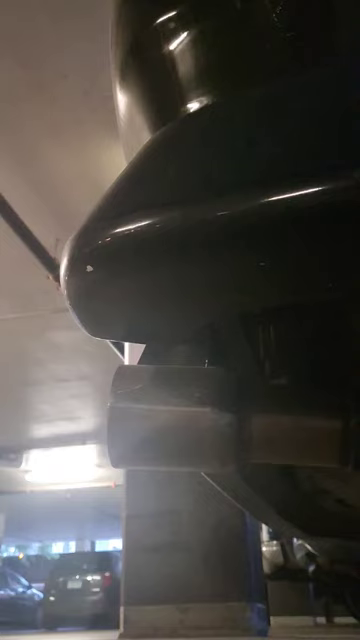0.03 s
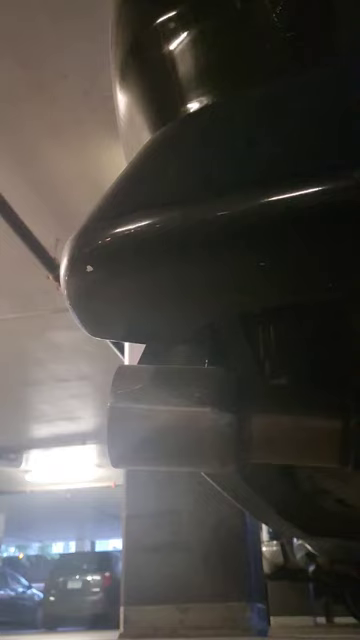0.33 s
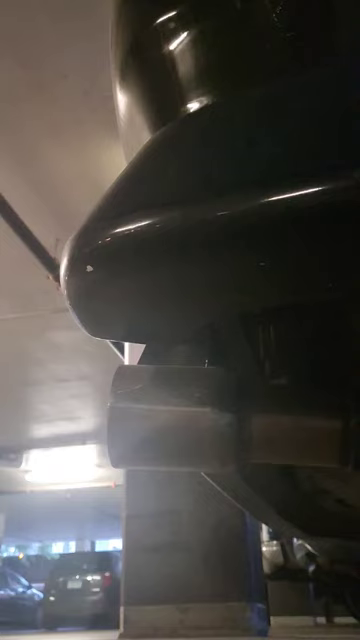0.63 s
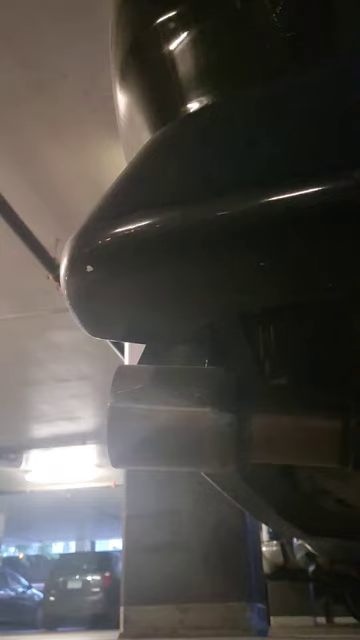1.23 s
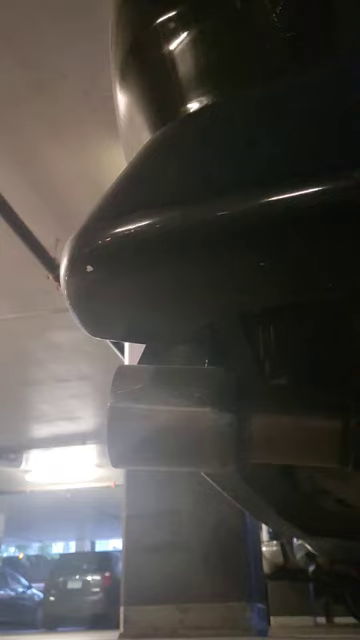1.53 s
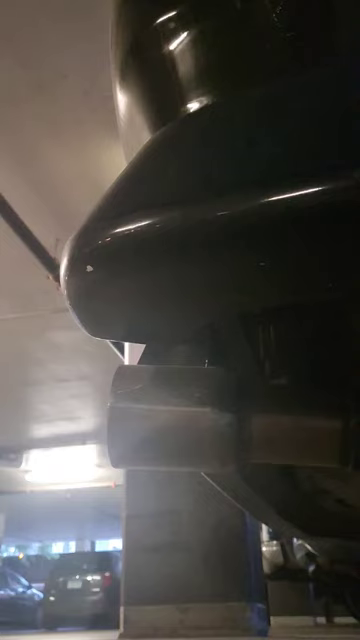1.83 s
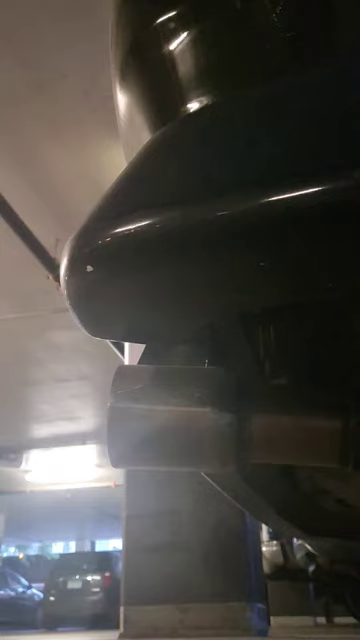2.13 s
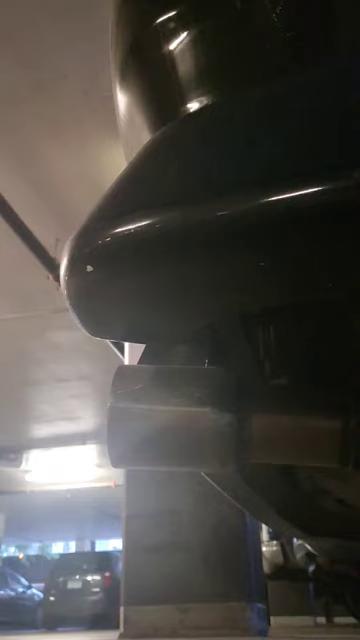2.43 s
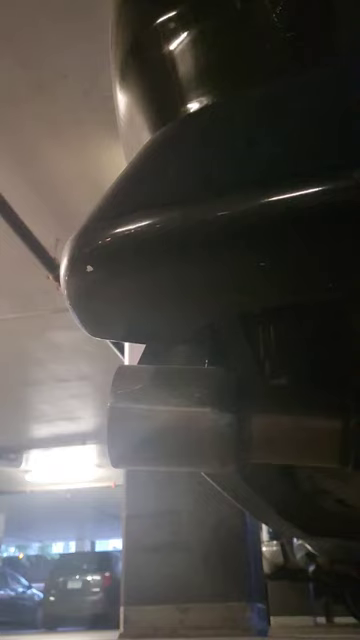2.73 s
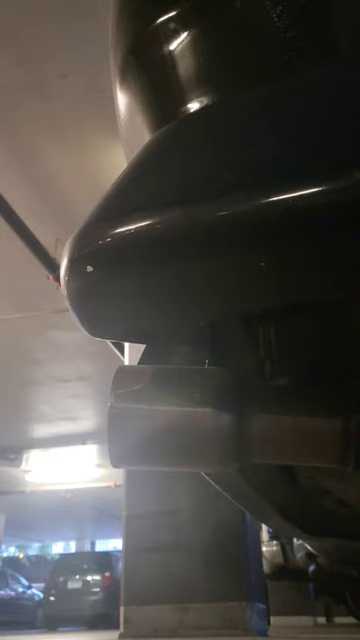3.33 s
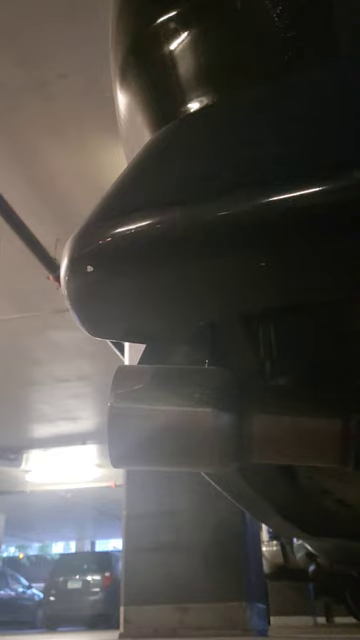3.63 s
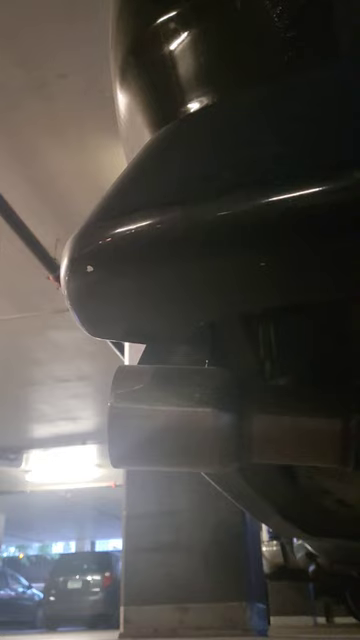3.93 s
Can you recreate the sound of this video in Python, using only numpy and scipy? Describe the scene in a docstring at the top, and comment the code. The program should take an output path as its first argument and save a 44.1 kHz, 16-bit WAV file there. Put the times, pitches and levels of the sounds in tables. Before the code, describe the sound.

A car starts in a concrete parking garage. Ventilation hums first, then the starter clacks and grinds, and the engine catches, sputters and settles into a fast idle, heard from the floor near the tailpipe.

```python
"""Ventilation hums in a concrete parking garage, with a few faint ticks. Then a four-cylinder car starts
from cold, heard from the floor near its tailpipe. The pinion's impact rings the ring gear, and the starter
grinds through eight compressions. The engine catches, flares, stumbles on a few misfires and settles into
a fast idle: a train of gas pulses that excites the resonances of silencer and pipe, reflected by the room."""
import sys
import numpy as np
from scipy import signal
from scipy.fft import rfft, irfft
from scipy.io import wavfile
from scipy.ndimage import uniform_filter1d, minimum_filter1d

SR = 44100
rng = np.random.default_rng(int(sys.argv[2]) if len(sys.argv) > 2 else 0)


def digitize_waveform(pressure):
    """Quantize a signal to 16-bit integers and store it at the path in sys.argv[1].

    Rows of a 2-D input are taken as channels; values are limited to [-1, 1].
    """
    field = np.atleast_2d(pressure).T
    bounded = np.clip(field, -1, 1)
    quanta = np.round(bounded * 32767).astype(np.int16)
    wavfile.write(sys.argv[1], SR, quanta)


N = 176400


def undb(db):
    """Amplitude ratio of a level in decibels."""
    return 10 ** (np.asarray(db) / 20)


def curve(table, t, column=1):
    """Linear interpolation of one column of a time table."""
    rows = np.array(table)
    return np.interp(t, rows[:, 0], rows[:, column])


def unit(x, start=0, end=4):
    """Normalisation to rms 1 between two times in seconds."""
    return x / np.sqrt(np.mean(x[int(start * SR):int(end * SR)] ** 2) + 1e-20)


def noise():
    """Gaussian white noise."""
    return rng.standard_normal(N)


def walk(rate):
    """Slow random modulation: `rate` values a second, joined by straight lines."""
    k = int(SR / rate)
    return uniform_filter1d(np.repeat(rng.standard_normal(N // k + 1), k), k)[:N]


def colour(x, points):
    """Zero-phase filtering by a spectrum of (f/Hz, level/dB) points."""
    hz, db = np.array(points, float).T
    f = np.maximum(np.arange(N + 1) * SR / (2 * N), 1)
    return irfft(rfft(x, 2 * N) * undb(np.interp(np.log(f), np.log(hz), db)))[:N]


def resonate(x, modes):
    """Superposition of driven resonators (f/Hz, bandwidth/Hz, level/dB)."""
    return sum(undb(db) * signal.lfilter(*signal.iirpeak(hz, hz / width, fs=SR), x)
               for hz, width, db in modes)


def strikes(times, gains):
    """Impulse train, one impulse per event."""
    return np.bincount((np.asarray(times) * SR).astype(int), gains, N)[:N]


def fade(x, decay_s):
    """Exponential decay after every impulse."""
    return signal.lfilter([1], [1, -np.exp(-1 / (decay_s * SR))], x)


def reverberate(x, t60):
    """Diffuse reverberation: convolution with decaying noise of unit energy."""
    tail = noise() * undb(-60 * np.arange(N) / SR / t60)
    return signal.fftconvolve(x, tail / np.linalg.norm(tail))[:N]


def stereo(mid, side):
    """Left and right as sum and difference."""
    return np.array([mid + side, mid - side])


# ducted air: spectrum, and side relative to mid (f/Hz, level/dB)
AIR_SPECTRUM = [(12, -29), (20, -24), (43, -1), (111, -2.5), (164, -4), (183, -11), (242, -8), (270, -9),
                (302, -9), (421, -10.5), (484, -10), (713, -11.5), (1510, -24), (2160, -32), (2340, -31),
                (6720, -47.5), (15000, -80)]
AIR_SIDE = [(60, -10.5), (110, -8.5), (200, -12.5), (380, -14.5), (690, -12.5), (1280, -4), (2360, 3.5),
            (4350, -1.5), (8020, -0.5), (14800, -1.5)]
# slow swell of the rush, taken about its mean (t/s, level/dB)
AIR_SWELL = [(0.0, -43.5), (0.05, -43), (0.15, -45), (0.84, -41.5), (1.4, -43), (1.52, -41.5), (2.4, -42.5)]
# fan tones (f/Hz, level/dB)
FAN_TONES = [(38.5, -46.5), (120, -44.5), (158, -47)]
def ventilation(t, air_db=-33, surge_db=2.2):
    """Flow noise: a broadband rush of ducted air with a surging rumble, plus wavering fan tones."""
    def rush():
        air = noise()
        rumble = colour(air, [(140, 0), (240, -40)])
        surge = undb(surge_db * walk(14)) - 1
        return unit(colour(air + rumble * surge, AIR_SPECTRUM))
    hum = sum(undb(db + 2 * walk(5.1)) * np.sqrt(2) * np.sin(2 * np.pi * hz * t + 0.33 * walk(4.76))
              for hz, db in FAN_TONES)
    swell = curve(AIR_SWELL, t)
    return undb(air_db + swell - swell.mean()) * stereo(rush(), colour(rush(), AIR_SIDE)) + hum


# faint ticks (t/s, level/dB) and their spectrum (f/Hz, level/dB)
TICKS = [(.606, -55.5), (.66, -61), (1.7615, -52.5)]
TICK_SPECTRUM = [(2000, -20), (7000, 0), (9000, -4), (15000, -12)]
def ticks():
    """Damped transients: tiny bursts of bright noise that decay exponentially."""
    times, db = np.array(TICKS).T
    return fade(strikes(times, undb(db)), decay_s=0.015) * unit(colour(noise(), TICK_SPECTRUM))


# pinion impacts (t/s, relative level/dB) and their spectrum (f/Hz, level/dB)
CLACKS = [(2.434, -15), (2.440, -6), (2.446, 0), (2.453, -1), (2.461, -2.5)]
CLACK_SPECTRUM = [(88, -45), (150, -12.5), (273, -7), (343, -11.5), (701, -17), (1250, -10), (1490, -15),
                  (1600, -14.5), (2700, -25.5), (6680, -22.5), (15000, -49)]
# modes of ring gear and bell housing (f/Hz, level/dB, T60/s)
GEAR_MODES = [(280.7, -11, 0.27), (1190, -11.5, 0.08), (1240, 4, 0.13), (1404, -10.5, .09),
              (1597, -5.5, 0.11), (1753, -20, 0.082), (2005, -12, 0.08), (2145, -5.5, 0.055),
              (4930, -11.5, 0.14), (6540, -15.5, .15), (6950, -11, 0.17), (7300, -16, 0.12)]
def pinion(t, crash_db=-18, ring_db=-21.5):
    """Impact excitation: the pinion chatters against the ring gear, whose modes then decay freely."""
    times, db = np.array(CLACKS).T
    impacts = strikes(times, undb(db))
    blows = fade(impacts, decay_s=0.02)
    crash = unit(colour(noise(), CLACK_SPECTRUM)) * blows / blows.max()
    ring = 0
    for hz, mode_db, t60 in GEAR_MODES:
        envelope = fade(impacts, t60 / np.log(1000))
        ring += undb(mode_db) * envelope / envelope.max() * np.sin(2 * np.pi * (hz * t + rng.random()))
    return undb(crash_db) * crash + undb(ring_db) * ring


STARTER_ON_S, CATCH_S = 2.45, 3.35
# compression strokes, which load the starter and puff from the tailpipe (t/s, puff level/dB)
COMPRESSIONS = [(2.617, -5), (2.737, -5.5), (2.841, -10), (2.941, -11.5), (3.037, -13.5), (3.1306, -11),
                (3.223, -11.5), (3.312, -7)]
# starter running, then coasting down (t/s, level/dB)
STARTER_LEVEL = [(2.44, -51), (2.48, -27.5), (2.56, -32), (2.85, -36.5), (3.17, -34), (3.35, -33.5),
                 (3.39, -32.5), (3.53, -35), (3.61, -42.5), (3.665, -32), (3.72, -63), (4.0, -60)]
# grinding of the gears (f/Hz, level/dB)
GRIND_SPECTRUM = [(150, -0.5), (300, -2.5), (480, -8), (700, -7), (950, -4.5), (1300, -6), (1890, -12.5),
                  (3320, -14.5), (7060, -15), (8380, -25.5), (15000, -32.5)]
# starter casing modes (f/Hz, bandwidth/Hz, level/dB)
CASING_MODES = [(953, 34, 5.5), (1240, 40, 2), (2154, 97, -7.5), (2710, 80, -7), (3267, 97, -5.5),
                (3842, 26, -1), (4180, 51, -11), (5480, 47, -13.5), (7270, 78, -15)]
# gear whine (harmonic number, level/dB)
MESH_PARTIALS = [(1, -1), (2, -33), (3, -16), (4, -16)]
def starter(t, motor_hz=367.7, mesh_hz=835, spin_up_s=0.09, speed_sag=0.055, release_s=0.05):
    """Load modulation: each compression slows the motor, whose gear teeth whine and rattle the casing."""
    beats = np.array(COMPRESSIONS)[:, 0]
    elapsed = t - STARTER_ON_S
    load = np.cos(2 * np.pi * np.interp(t, beats, np.arange(len(beats))))
    load *= np.clip(elapsed / (beats[0] - STARTER_ON_S), 0, 1)
    inrush = np.exp(-np.maximum(elapsed, 0) / spin_up_s)
    engaged = np.clip(1 - (t - CATCH_S) / release_s, 0, 1)  # the pinion slips out as the engine catches
    speed = (1 - inrush) * (1 - speed_sag * load + 0.012 * walk(40))  # 1 is nominal speed
    travel = np.cumsum(speed) / SR
    contacts = np.diff(np.floor(mesh_hz * travel), prepend=0)
    teeth = contacts * undb(2.7 * noise()) * np.sign(noise())
    cranking_s = (2.6, 3.3)
    grind = unit(noise() + undb(3.5) * unit(teeth, *cranking_s))
    casing = sum(resonate(grind * undb(4 * walk(22)), [mode]) for mode in CASING_MODES)
    body = unit(colour(grind, GRIND_SPECTRUM), *cranking_s)
    body += engaged * undb(-6) * unit(casing, *cranking_s)
    motor = (1 - inrush) * undb(-6 + 18 * inrush + 2 * walk(18)) * np.sin(2 * np.pi * motor_hz * travel)
    whine = sum(undb(db - 3 + 4.5 * walk(45)) * np.sin(2 * np.pi * k * mesh_hz * travel)
                for k, db in MESH_PARTIALS)
    whine *= engaged * np.clip(elapsed / (CATCH_S - STARTER_ON_S), 0, 1)  # grows until the catch
    level_db = curve(STARTER_LEVEL, t) - 2.8 * load + 1.3 * walk(90)
    return (body + motor + whine) * undb(level_db)


def groan(t, centre_s=2.548, width_s=0.031, hz=245, db=-24.5):
    """Gaussian tone burst: the motor groans briefly as it takes up the load."""
    return undb(db) * np.exp(-((t - centre_s) / width_s) ** 2) * np.sin(2 * np.pi * hz * t)


def thump(t, when, width_s):
    """Pulse radiation: the pressure wave of one slug of gas leaving the silencer."""
    u_squared = np.minimum(((t - when) / width_s) ** 2, 100)
    return (1 - u_squared) * np.exp(-u_squared / 2)


# engine firing rate (t/s, f/Hz)
FIRING_RATE = [(3.34, 29.7), (3.42, 32.2), (3.47, 48.1), (3.56, 53.3), (3.63, 47.4), (3.75, 47.1),
               (3.83, 42.1), (3.92, 45), (4.0, 45.3)]
# firings that fail (t/s, level change/dB)
MISFIRES = [(3.546, -12.5), (3.604, -37), (3.666, -6.5), (3.688, -9.5), (3.709, -23), (3.73, -29),
            (3.818, -22)]
def firings(t):
    """Phase as the integral of frequency: one firing per cycle. Returns times and misfire losses."""
    phase = np.cumsum(curve(FIRING_RATE, t + CATCH_S)) / SR
    count = int(np.interp(t[-1] - CATCH_S, t, phase)) + 2
    times = np.interp(np.arange(count), phase, t) + CATCH_S
    loss_db = np.zeros(count)
    for when, db in MISFIRES:
        loss_db[np.argmin(abs(times - when))] = db
    return times, loss_db


# strength of combustion (t/s, thump level/dB, bark level/dB)
COMBUSTION = [(3.35, -7.5, 0), (3.385, -3.5, 5), (3.435, -2, 10.5), (3.5, -1.5, 4), (3.58, -7.5, -2),
              (3.63, 0.5, 3.5), (3.76, -3.5, 1.5), (3.87, -6, -0.5), (4.0, -8, -3)]
# silencer modes (f/Hz, bandwidth/Hz, level/dB)
SILENCER_MODES = [(65.8, 21, 0.5), (86, 6, -3), (135.4, 6.2, -4.5), (190, 44, -2)]
def silencer(t, times, loss_db, idle_hz=44.1):
    """Cavity resonance: soft cranking puffs, then the thumps of the firings, make the silencer boom."""
    puffs = sum(undb(db) * thump(t, when, width_s=0.0028) for when, db in COMPRESSIONS)
    widths_s = 0.0024 * (idle_hz / curve(FIRING_RATE, times)) ** 0.49  # slower firings, longer pulses
    sizes = undb(6 + curve(COMBUSTION, times) + loss_db)
    thumps = sum(size * thump(t, when, width) for when, size, width in zip(times, sizes, widths_s))
    pulses = puffs + thumps
    return pulses + resonate(pulses, SILENCER_MODES)


# exhaust pipe: modes (f/Hz, bandwidth/Hz, level/dB) and spectral envelope (f/Hz, level/dB)
PIPE_MODES = [(198, 32, -5), (268, 24, -7.5), (286.6, 16.8, -4.5), (332, 15.7, -2), (394.3, 17, 2),
              (444.3, 14.4, 2.5), (469, 21, -1.5), (520, 20, 2.5), (567, 26, -1), (609, 23, -1),
              (645.5, 24, 2), (712, 32, -1.5), (892, 23, -3.5), (958, 14, 3.5)]
PIPE_SPECTRUM = [(100, -29.5), (180, 24.5), (600, 3.5), (1000, -8.5), (1500, -44), (8000, -45)]
def pipe_bark(cracks, db=-15.5):
    """Standing waves: the crack of each firing and its gust of gas ring the exhaust pipe."""
    gust = fade(cracks, decay_s=0.009) * noise()
    drive = 0.5 * unit(gust) - unit(cracks)
    # neighbouring modes swing in opposite senses at the open end
    ring = resonate(drive, PIPE_MODES[::2]) - resonate(drive, PIPE_MODES[1::2])
    return undb(db) * unit(colour(ring, PIPE_SPECTRUM), CATCH_S)


# heat shield modes (f/Hz, bandwidth/Hz, level/dB), applied twice in series
SHIELD_MODES = [(1300, 70, 2.5), (2975, 240, -2), (3224, 220, -3.5), (3620, 180, -6.5)]
def heat_shield(gas, db=-46):
    """Forced vibration: the firings rattle the heat shield, some far more than others."""
    drive = gas * undb(5 * walk(45))
    return undb(db) * unit(resonate(resonate(drive, SHIELD_MODES), SHIELD_MODES), CATCH_S)


# rasp of the exhaust gas (f/Hz, level/dB)
RASP_SPECTRUM = [(300, 6), (600, 18), (950, 4), (1350, -7.5), (1750, -30), (2550, -24), (3150, -15),
                 (4200, -8.5), (5500, -11.5), (7200, -11.5), (8400, -17.5), (15000, -19)]
def rasp(gas, db=-34):
    """Amplitude-modulated noise: the exhaust hisses in bursts at the firing rate."""
    return undb(db) * unit(colour(gas, RASP_SPECTRUM), CATCH_S)


# hard firings (t/s, relative level/dB)
POPS = [(3.378, -9), (3.408, -5), (3.4565, -1), (3.479, -1.5), (3.4995, -0.5), (3.560, 0), (3.620, 3),
        (3.745, 0.5), (3.836, -4)]
# their ring: modes (f/Hz, bandwidth/Hz, level/dB) and spectral envelope (f/Hz, level/dB)
POP_MODES = [(405, 54, 4), (646, 92, 1), (930, 96, 6.5), (1270, 64, -10), (2090, 550, -18),
             (2940, 350, -14.5)]
POP_SPECTRUM = [(150, -21), (350, 6.5), (3400, -8), (5000, -8), (15000, -17)]
def pops(peak_db=-18.5):
    """Damped resonance: firings that burn hard burst from the tailpipe with a sharp, hollow pop."""
    times, db = np.array(POPS).T
    burst = fade(strikes(times, undb(db)), decay_s=0.0067)
    burst = fade(burst, 0.001)  # rounds the attack
    ring = unit(colour(resonate(noise(), POP_MODES), POP_SPECTRUM))
    return undb(peak_db) * ring * burst / burst.max()


# echoes from ceiling and walls (delay/s, amplitude ratio)
ECHOES = [(.016, 0.27), (0.029, 0.16), (.039, 0.26), (.054, .13), (0.066, 0.25)]
def exhaust(t, crack_lead_s=0.004994):
    """Superposition: all the exhaust's sounds, with early reflections of its thumps and bark."""
    times, loss_db = firings(t)
    crack_db = curve(COMBUSTION, times, column=2) + loss_db + 0.7 * rng.standard_normal(len(times))
    cracks = strikes(times - crack_lead_s, undb(crack_db))
    gas = fade(cracks, decay_s=0.014) * noise()
    pulses = silencer(t, times, loss_db) + pipe_bark(cracks)
    echoes = sum(gain * np.interp(t - delay, t, pulses) for delay, gain in ECHOES)
    return pulses + echoes + heat_shield(gas) + rasp(gas) + pops()


# weighting of the exhaust that reaches the far walls (f/Hz, level/dB)
GARAGE_SEND = [(80, -1.5), (160, -8.5), (300, -5.5), (8000, 6)]
# weighting of the reflections' side signal (f/Hz, level/dB)
REFLECTION_SIDE = [(60, -13), (200, -34), (400, -22), (700, -13), (1280, -6), (2360, -1.5), (15000, -3)]
def scene(garage_t60_s=0.87, wet_db=-7, left_bias_db=0.7):
    """Direct and diffuse fields: the garage rings, and flutter between floor and car spreads the sound."""
    t = np.arange(N) / SR
    front = pinion(t) + starter(t) + groan(t) + ticks()
    rear = exhaust(t)
    far = undb(wet_db) * (front + colour(rear, GARAGE_SEND))
    flutter = undb(3.5) * reverberate(front + rear, t60=0.11)
    side = colour(flutter + reverberate(far, garage_t60_s), REFLECTION_SIDE)
    mid = front + reverberate(far, garage_t60_s)
    tailpipe = rear * undb([[left_bias_db / 2], [-left_bias_db / 2]])
    return tailpipe + stereo(mid, side) + ventilation(t)


def record(dry, ceiling=0.97, max_hold_db=5.5, recovery_db_per_s=1.5, smooth_s=0.0027, top_hz=15450):
    """Peak limiting: loud peaks turn the gain down and it recovers slowly; a low-pass cuts the top."""
    window = int(smooth_s * SR)
    recovery_db = recovery_db_per_s * np.arange(N) / SR
    over_db = 20 * np.log10(np.maximum(abs(dry).max(axis=0) / ceiling, 1))
    held_db = np.maximum.accumulate(np.minimum(over_db, max_hold_db) + recovery_db) - recovery_db
    gain = undb(-np.maximum(held_db, over_db))
    gain = uniform_filter1d(minimum_filter1d(gain, window), window)
    return signal.sosfilt(signal.ellip(10, 0.2, 80, top_hz, fs=SR, output="sos"), dry * gain)


dry = scene()
out = record(dry)
digitize_waveform(out)
```